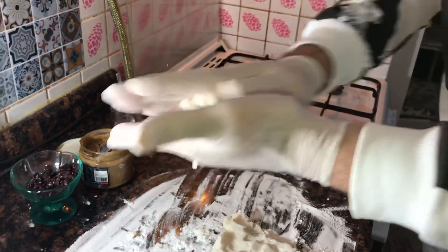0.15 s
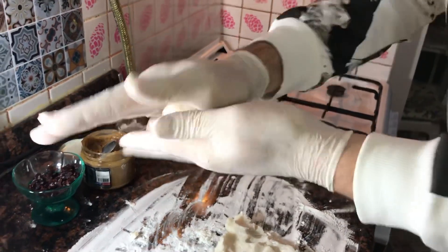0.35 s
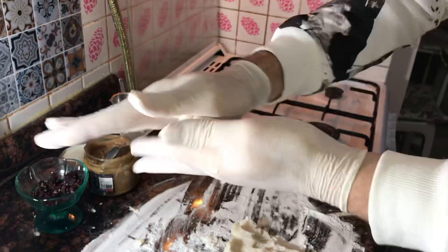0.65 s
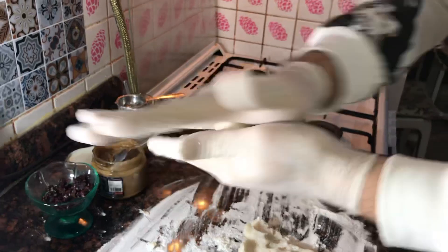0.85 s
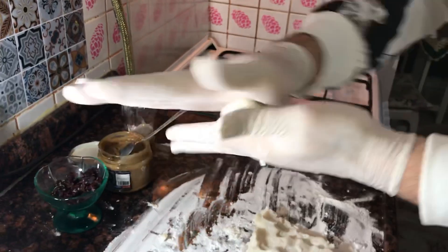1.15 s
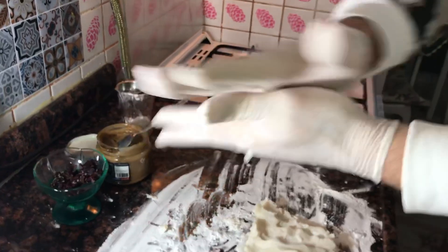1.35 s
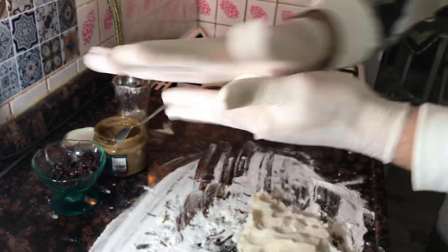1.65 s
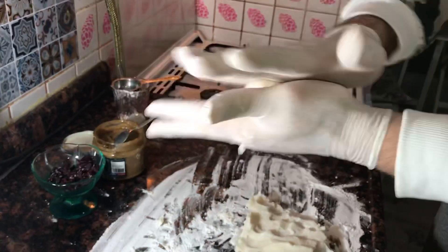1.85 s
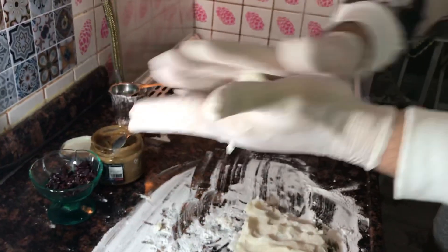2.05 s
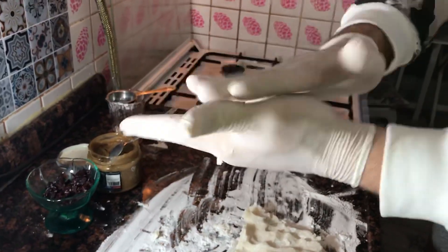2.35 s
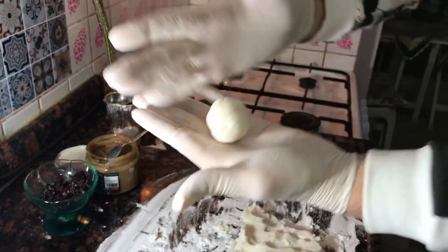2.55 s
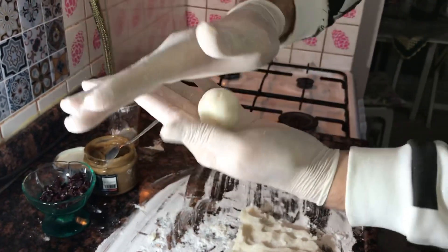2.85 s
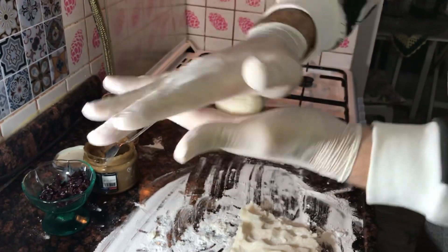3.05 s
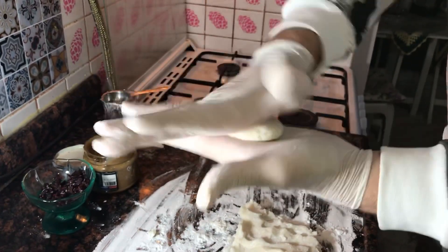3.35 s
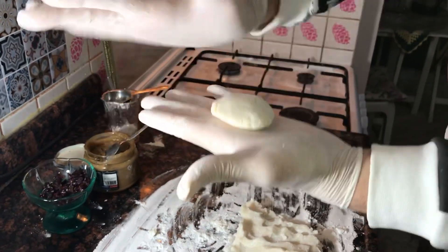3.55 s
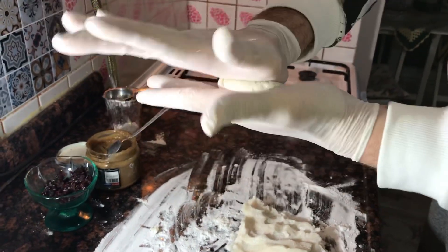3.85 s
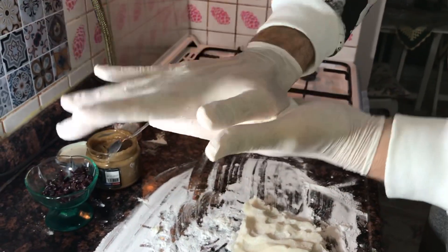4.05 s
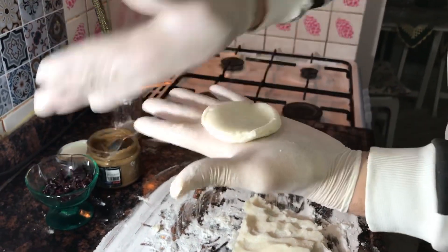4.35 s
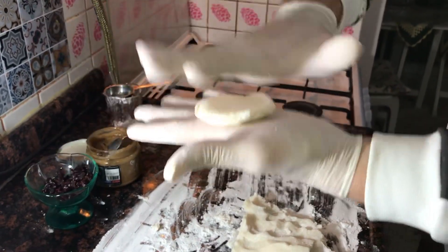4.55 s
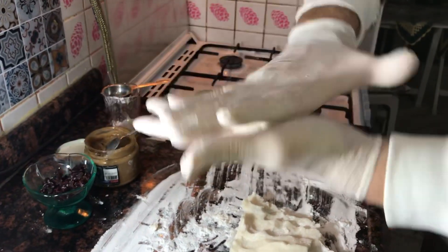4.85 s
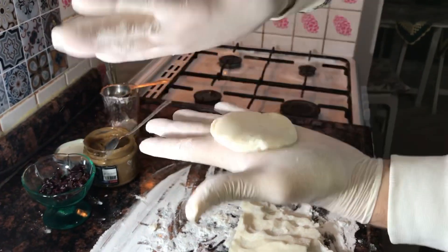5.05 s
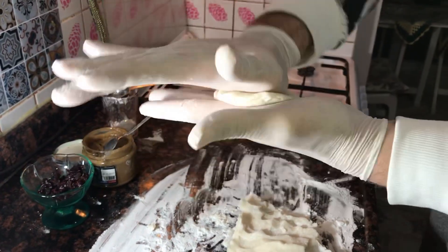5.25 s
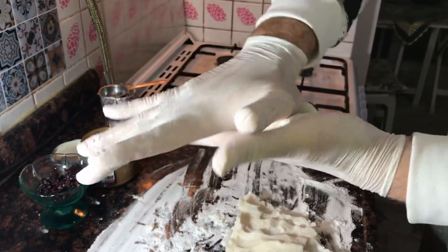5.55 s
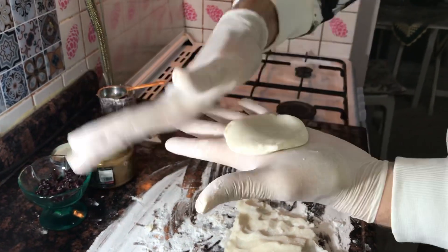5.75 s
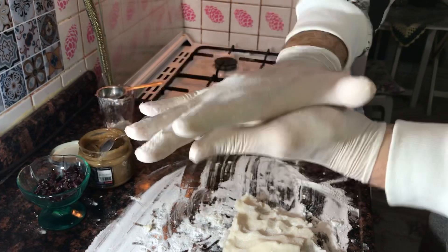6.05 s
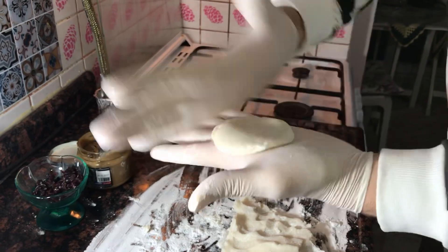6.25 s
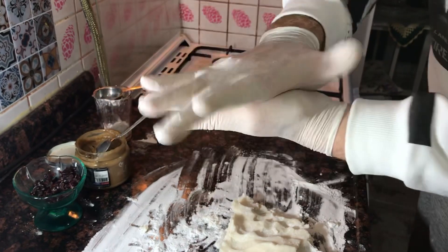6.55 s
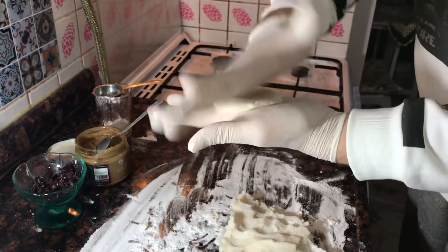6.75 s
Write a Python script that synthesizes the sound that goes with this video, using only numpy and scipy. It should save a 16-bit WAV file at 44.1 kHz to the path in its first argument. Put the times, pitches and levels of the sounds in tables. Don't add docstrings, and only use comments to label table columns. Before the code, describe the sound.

Thin gloves rub in grainy strokes over soft dough, then sticky snaps, pops and soft pats over a quiet low kitchen hum.

```python
import sys
import numpy as np
from scipy import signal
from scipy.fft import rfft, irfft, next_fast_len
from scipy.io import wavfile
from scipy.ndimage import uniform_filter1d, map_coordinates

SR = 44100
rng = np.random.default_rng(int(sys.argv[2]) if len(sys.argv) > 2 else 0)


def generate_wav(sig):
    pcm = np.round(np.clip(np.atleast_2d(sig).T, -1, 1) * 32767).astype(np.int16)
    wavfile.write(sys.argv[1], SR, pcm)


def linear_from_db(decibels):
    return 10 ** (np.asarray(decibels, float) / 20)


N = 304718


def unit(x):
    return x / np.sqrt(np.mean(x ** 2) + 1e-20)


def along(points, hz):
    f, v = np.transpose(points)
    return np.interp(np.log(hz + 1), np.log(f + 1), v)


def curves(rows):
    s, *columns = np.transpose(rows)
    return [np.interp(np.arange(N) / SR, s, column) for column in columns]


def wobble(rate):
    return map_coordinates(rng.standard_normal(int(N * rate / SR) + 4), [np.arange(N) * rate / SR])


def filtered(x, response):
    m = next_fast_len(len(x) + 2048)
    return irfft(rfft(x, m) * response(np.fft.rfftfreq(m, 1 / SR)), m)[:len(x)]


def band(hz, low_hz, high_hz):
    return 1 / np.sqrt((1 + (low_hz / (hz + 1)) ** 6) * (1 + (hz / high_hz) ** 6))


def patchy(patchy_db):
    z = signal.stft(rng.standard_normal(N), nperseg=256)[2]
    field = uniform_filter1d(rng.standard_normal(z.shape), size=7, axis=0)
    field = uniform_filter1d(field, size=9, axis=1)
    return signal.istft(z * linear_from_db(patchy_db * unit(field)), nperseg=256)[1][:N]


def region_levels(db, bright_db, body_db):
    return db - bright_db, db + body_db, db + bright_db


# (frequency [Hz], level [dB per Hz])
FILM_COLOUR = [(410, -15), (700, -13.5), (1120, -13), (1710, -10.5), (1920, -11), (2730, -8.5), (4260, -3),
               (4990, -1.5), (6070, -3), (10300, 0), (12500, 0), (15200, 0), (16000, -5.5)]
# (low edge [Hz], high edge [Hz])
HAND_REGIONS = [
    (700, 2500),
    (2500, 7000),
    (7000, 17000),
]
# (time [s], length [s], level [dB], brightness [dB])
ROLLS = [(.005, 0.011, -54, 2), (0.052, 0.0081, -46, 0), (.195, 0.017, -55.5, 11.5),
         (0.26, 0.051, -52, 6.5), (0.321, 0.039, -54.5, 0), (0.408, .014, -59.5, -2),
         (0.425, 0.033, -54, 6.5), (0.478, 0.015, -53.5, 9), (0.517, 0.022, -55, 6),
         (0.559, 0.033, -56.5, 11.5), (0.675, 0.057, -60.5, 4), (0.744, 0.036, -57.5, 8),
         (0.781, 0.035, -53.5, 0.5), (0.83, 0.032, -60.5, 7.5), (0.956, 0.014, -64.5, 12),
         (1.045, 0.032, -58.5, 2.5), (1.226, 0.022, -59.5, 4.5), (1.313, 0.034, -62, 3.5),
         (1.346, 0.025, -60, 4), (1.156, 0.013, -65, 3), (1.505, 0.011, -56.5, 9), (1.661, 0.021, -62, 2),
         (1.758, 0.023, -65.5, 10), (1.813, 0.043, -62.5, 4), (1.865, 0.019, -59, 5),
         (1.909, 0.01, -58, -1), (2.035, 0.019, -60.5, 1.5), (2.131, 0.057, -59.5, 3.5),
         (2.235, 0.018, -53.5, 6), (2.258, 0.015, -50, 9.5), (2.345, 0.042, -62.5, 5.5),
         (2.406, 0.038, -68, 6.5)]
# (time [s], length [s], level [dB], brightness [dB])
BRUSHES = [(1.107, 0.072, -62.5, 3.5), (1.573, 0.18, -65.5, 2), (1.428, 0.013, -61.5, 2),
           (2.479, 0.039, -75, 7), (2.932, 0.053, -72.5, 3.5), (3.001, 0.09, -68, 3.5),
           (3.251, 0.049, -65, 0), (4.262, 0.052, -66, 5.5), (4.712, 0.032, -67, 5.5),
           (5.402, 0.05, -70.5, 6.5), (5.57, 0.062, -62, 5), (6.125, 0.037, -66, 4.5),
           (6.72, 0.074, -70.5, 4)]
# (time [s], length [s], level [dB], brightness [dB], air gap [Hz])
PEELS = [(3.167, 0.083, -65, -1, 3300), (3.329, 0.029, -54.5, 3, 4150), (3.353, 0.029, -56, 5.5, 4180),
         (3.371, 0.0078, -46, 0, 2980), (3.397, 0.043, -65.5, -1, 3450), (4.107, 0.014, -56.5, 0.5, 3550),
         (4.129, 0.038, -53, 2.5, 3280), (4.145, 0.012, -48, -1, 5560), (4.168, 0.011, -42.5, 0, 5370),
         (4.194, 0.038, -48, -1.5, 4740), (4.813, 0.055, -62.5, 4, 5980), (4.855, 0.0046, -46, 0, 3300),
         (4.858, 0.0074, -31.5, 0, 4200), (4.863, 0.024, -42, -4, 5800), (4.903, 0.03, -69, -11, 3700),
         (5.512, 0.026, -59, 2, 5000), (5.636, 0.045, -48, 3, 4300), (5.656, 0.017, -43.5, -1, 4830),
         (5.681, 0.014, -61, 5, 4570), (6.219, 0.01, -50.5, 5, 3600), (6.701, 0.043, -60, 1.5, 4500)]
# (time [s], length [s], level [dB], brightness [dB], air gap [Hz])
LANDINGS = [
    (4.563, 0.009, -47, -7, 4160),
    (4.625, 0.078, -66, 2, 3480),
    (5.169, 0.014, -60.5, -6, 3600),
    (5.931, 0.013, -50, -8, 2280),
    (5.947, 0.038, -66.5, -7, 1210),
    (5.989, 0.089, -72, 4, 1400),
    (6.503, 0.0087, -39.5, -4.5, 5800),
    (6.508, 0.015, -43.5, -0.5, 2120),
    (6.532, 0.013, -56.5, -5, 4000),
    (6.564, 0.038, -72, 0, 3280),
]
# (time [s], length [s], level [dB], brightness [dB], air gap [Hz])
TOUCHES = [(0.236, .012, -55, -4, 1710), (0.762, 0.015, -51.5, 6, 6800), (4.838, .016, -54, -2, 6000),
           (5.601, .01, -52.5, -3, 2100), (0.18, 0.011, -57, 2, 5500), (0.648, 0.007, -58, 1, 9000),
           (2.879, .016, -62, 3, 5440), (3.639, 0.017, -63, -1.5, 1900), (4.1497, .011, -40, -1, 5600),
           (4.5547, 0.0062, -50.5, -4, 2700), (5.481, 0.0053, -66.5, -5, 5000),
           (5.491, 0.011, -66.5, 12, 9000), (5.583, 0.022, -48.5, 5.5, 5800),
           (5.9216, 0.0096, -50, -10, 1900), (6.146, 0.0045, -62, 3, 6000), (6.15, 0.0058, -52, 8, 3220),
           (6.154, 0.0095, -54.5, 8, 6500), (6.175, 0.015, -59, 7.5, 6500), (6.205, 0.0067, -59, 8, 6500),
           (6.494, 0.0063, -46, -5, 2400), (6.734, 0.0044, -61.5, 6, 9000), (6.745, .004, -66, 3, 5500)]


def slips():
    slip_body_db, body_db_per_oct = -4.5, 14
    cupped_hz = 2500
    grit_db = 3.1
    out, t = np.zeros(N + SR), np.arange(-SR // 16, SR // 16) / SR
    flat = [(*row, 4000 + 192 * row[3]) for row in ROLLS + BRUSHES]
    events = [(row, False) for row in flat + PEELS + LANDINGS] + [(row, True) for row in TOUCHES]
    for (s, length, level_db, bright_db, gap_hz), sudden in events:
        steps = rng.standard_normal(len(t) // 24 + 1).clip(-2, 1.7)
        grains = linear_from_db(grit_db * np.repeat(steps, 24)[:len(t)])
        white = grains * rng.standard_normal(len(t))
        if sudden:
            swell = (t >= 0) * np.exp(-(t / (0.66 * length)) ** 2)
        else:
            shape = np.clip(length / 0.03, 0.75, 1.5) * np.where(t < 0, 2.8, 1.4)
            swell = np.exp(-(np.abs(t) / (0.53 * length)) ** shape)

        def cavity(f):
            return linear_from_db(along(FILM_COLOUR, f)) * (1 + 1.36 / (1 + ((f - gap_hz) / (0.1 * gap_hz)) ** 2))

        body_db = slip_body_db + body_db_per_oct * min(0, np.log2(gap_hz / cupped_hz))
        levels = region_levels(level_db, bright_db, body_db)
        parts = [linear_from_db(db) * unit(filtered(white, lambda f: cavity(f) * band(f, *edges)))
                 for db, edges in zip(levels, HAND_REGIONS)]
        out[round(s * SR):][:len(t)] += swell * sum(parts)
    return out[SR // 16:][:N]


# (time [s], effort [dB], brightness [dB])
RUB = [(0.0, -50.5, 3), (0.4, -55, 1), (0.52, -50.5, 5.5), (0.66, -57, 1.5), (2.2, -59.5, 3.5),
       (2.31, -58.5, 4), (2.5, -70, -6.5), (3.3, -65.5, 4), (3.7, -71.5, 7), (4.04, -70, 2), (4.18, -52, 1),
       (4.39, -75.5, 1), (4.73, -63, 3.5), (5.0, -72.5, 1), (5.5, -61, -6.5), (5.75, -73.5, 2),
       (6.15, -67, -8.5), (6.91, -82, 12)]


def rubbing():
    jerk = 2 * wobble(30) + 0.69 * wobble(110)
    ticks = rng.random(N) < 600 / SR
    ticks = ticks * linear_from_db(np.minimum(4 * rng.exponential(size=N), 9)) * rng.choice([-1, 1], N)
    out = np.zeros(N)
    for level_db, (low, high) in zip(region_levels(*curves(RUB), body_db=3), HAND_REGIONS):
        slip = linear_from_db(jerk + 3.9 * wobble(30)) * (patchy(patchy_db=1.5) + 0.13 * unit(ticks))
        coloured = filtered(slip, lambda f: linear_from_db(along(FILM_COLOUR, f)) * band(f, low, high))
        out += linear_from_db(level_db - 9.0) * unit(coloured)
    return out


# (time [s], ring [dB], ring pitch [Hz], crack [dB])
SNAPS = [(0.051, -39, 4030, -21), (0.108, -32, 5300, -48), (0.3248, -27.5, 4040, -48),
         (0.3965, -28, 3600, -52), (0.4724, -38, 3080, -36), (0.9506, -55, 6600, -36),
         (1.2235, -45, 2410, -39), (1.5006, -35, 4230, -36), (1.858, -31, 5700, -48),
         (2.255, -67, 6030, -20), (3.329, -24, 4040, -50), (3.37, -27, 3160, -28), (3.6383, -47, 2330, -51),
         (3.805, -42, 8000, -57), (4.167, -27, 4500, -31.5), (4.1814, -24, 4450, -33.5),
         (4.1956, -24.5, 3770, -38), (4.5622, -25.5, 6900, -41), (4.8588, -12, 3400, -16),
         (5.177, -44, 2280, -60), (3.349, -32, 5000, -40), (3.361, -50, 9000, -36), (5.584, -38, 6220, -36),
         (5.655, -19, 6160, -42), (6.1506, -31, 3240, -34), (6.217, -31, 3596, -16),
         (6.5035, -22, 5850, -19),
         (.129, -29, 7000, -56), (.155, -32, 8200, -56), (.28, -33, 6500, -46), (.65, -46, 7500, -52),
         (3.707, -62, 9000, -58), (3.825, -46, 8800, -66), (4.8582, -7.5, 5840, -16),
         (5.639, -41, 2610, -38.5), (6.177, -45, 6500, -42), (5.566, -42, 6000, -44),
         (5.62, -38, 5000, -42), (6.2135, -38, 6970, -32), (6.677, -34, 3300, -66), (6.712, -39, 6540, -37)]


def snaps():
    out, t = np.zeros(N + SR), np.arange(-64, SR // 40) / SR
    attack_t60_s, ring_t60_s, crack_t60_s = 0.0018, 0.0067, 0.032
    for s, ring_db, hz, crack_db in SNAPS:
        white = rng.standard_normal((2, len(t)))
        breath = unit(filtered(white[0], lambda f: band(f, hz / 1.42, hz * 1.2)))
        ring = 0.49 * np.cos(2 * np.pi * hz * t) + 0.32 * breath
        hiss = unit(filtered(white[1], lambda f: band(f, 8500, 14500)))
        crack = 0.25 * np.cos(2 * np.pi * 11800 * t) + 0.75 * hiss
        crack = linear_from_db(-60 * np.abs(t) / crack_t60_s) * crack
        fade = linear_from_db(-60 * np.where(t < 0, -t / attack_t60_s, t / ring_t60_s))
        for db, part in ((ring_db - 6.5, fade * ring), (crack_db - 0.8, fade * crack)):
            out[round(s * SR):][:len(t)] += linear_from_db(db) * part / np.abs(part).max()
    return out[64:][:N]


# (time [s], peak [dB], low edge [Hz], high edge [Hz], t60
# [s])
PATS = [
    (0.473, -43.5, 300, 990, 0.048),
    (3.367, -51, 500, 1500, 0.094),
    (4.148, -45.5, 550, 1200, 0.075),
    (4.198, -44, 198.5, 800, 0.079),
    (4.563, -39, 69.6, 700, 0.065),
    (4.857, -33, 193, 915, 0.11),
    (5.653, -45, 198, 700, 0.1),
    (5.9253, -30.5, 99, 570, 0.07),
    (6.499, -36, 80.4, 590, 0.13),
    (6.8325, -40.5, 600, 5200, 0.0047),
]


def pats():
    out, t = np.zeros(N + SR), np.arange(-SR // 50, SR // 7) / SR
    for s, db, low_hz, high_hz, t60 in PATS:
        puff = rng.standard_normal(len(t)) * linear_from_db(-60 * np.abs(t) / t60) * (t > 0)
        u = np.maximum(t, 0) * high_hz * 3.0
        push = -u * np.exp(-u)
        for gain, stroke in ((0.9, push), (0.6, puff)):
            part = filtered(stroke, lambda f: band(f, low_hz, high_hz))
            out[round(s * SR):][:len(t)] += linear_from_db(db) * gain * part / np.abs(part).max()
    return out[SR // 50:][:N]


# (time [s], peak [dB], ring pitch [Hz])
POPS = [
    (.0512, -29, 4000),
    (0.765, -31, 2400),
    (.9505, -40, 7000),
    (3.368, -28, 3270),
    (4.1512, -26, 5600),
    (4.8907, -30, 4170),
    (5.1718, -29, 2470),
    (5.9255, -43, 1610),
    (6.499, -20, 2500),
    (6.5034, -22, 3000),
]


def pops():
    out, t = np.zeros(N + SR), np.arange(SR // 50) / SR
    for s, db, hz in POPS:
        spike = np.exp(-t / 0.00007) * np.cos(2 * np.pi * 6000 * t)
        ring = 0.64 * linear_from_db(-60 * t / 0.0074) * np.sin(2 * np.pi * hz * t)
        out[round(s * SR):][:len(t)] += linear_from_db(db) * (spike - ring)
    return out[:N]


# (start [s], length [s], level [dB], first [Hz], last
# [Hz])
POCKETS = [(0.239, 0.017, -52, 1760, 1670), (0.244, .028, -49, 4500, 9500), (.41, 0.02, -51, 5000, 9000),
           (0.474, 0.021, -52, 2700, 3300), (.505, 0.035, -54, 3200, 5500), (0.544, 0.03, -44, 13500, 9500),
           (0.547, 0.026, -54, 3180, 6560), (.765, 0.011, -46.5, 2286, 2005),
           (.768, 0.028, -47.5, 4400, 4000), (0.77, 0.02, -46, 6700, 7150), (1.044, 0.015, -58, 4480, 4500),
           (1.105, 0.027, -57, 5400, 5240), (1.22, 0.027, -62, 4380, 4230),
           (1.65, 0.042, -60.5, 4000, 3700), (1.79, 0.031, -62, 4200, 3820), (1.906, .02, -62, 4210, 3900),
           (2.881, .015, -57, 3120, 3330), (3.377, .015, -58, 3400, 3600), (3.658, .018, -65, 4580, 4220),
           (3.775, .012, -59.5, 9150, 9000),
           (4.14, 0.038, -43, 6000, 5400), (4.166, .01, -39, 12400, 12300), (4.185, .02, -49, 4260, 4800),
            (4.561, .006, -38.5, 3290, 3570), (4.853, 0.013, -30, 4210, 4100),
            (4.857, 0.01, -33, 5900, 5780), (4.87, .025, -47, 5900, 6120), (4.872, 0.01, -38, 3200, 3500),
            (4.873, .01, -39, 4270, 4080), (4.894, 0.0057, -44, 4080, 3800),
            (4.915, 0.022, -58, 4000, 3470), (4.94, .05, -57, 3700, 3900), (5.172, .006, -60, 2480, 2170),
            (5.507, .045, -58, 8500, 8700), (5.583, .015, -52, 2190, 2100),
            (5.585, 0.015, -49, 12300, 12300), (5.617, 0.048, -51.5, 1980, 2150),
            (5.927, 0.0047, -38, 1850, 1480), (5.923, 0.014, -46, 910, 800),
            (4.556, 0.012, -52.5, 1100, 1000), (5.939, 0.052, -56, 2010, 1394),
            (6.498, 0.0096, -33, 2490, 3210), (6.5, 0.016, -43, 4260, 4000),
            (6.503, .014, -46.5, 1490, 1380), (6.522, .03, -58, 2510, 2310),
            (6.681, 0.022, -55, 2790, 2620), (6.684, 0.019, -58, 4500, 4370)]


def pockets():
    out = np.zeros(N + SR)
    for s, length, db, first_hz, last_hz in POCKETS:
        u = np.arange(SR // 12) / SR / length
        progress = np.minimum(u, 1)
        white = rng.standard_normal((2, len(u)))
        a, b = (filtered(v, lambda f: band(f, 0, 0.17 * first_hz)) for v in white)
        turn = 2 * np.pi * np.cumsum(first_hz * (last_hz / first_hz) ** progress) / SR
        whistle = unit(a * np.cos(turn) + b * np.sin(turn))
        out[round(s * SR):][:len(u)] += linear_from_db(db) * np.sin(np.pi * progress ** 0.67) * whistle
    return out[:N]


def crinkles():
    centre_hz, log_spread, cycles, over_effort_db = 4800, 0.5, 10, -4.5
    draw, t = rng.random((2000, 2)), np.arange(260) / SR
    at = (draw[:, 0] * N).astype(int)
    hz = centre_hz * np.exp(log_spread * rng.standard_normal((len(at), 1)))
    hz = np.clip(hz, 900, 14000)
    luck_db = -np.maximum(4 * np.log(draw[:, 1]), -10)
    size = linear_from_db(curves(RUB)[0][at] + over_effort_db + luck_db)[:, None]
    rings = size * np.sin(2 * np.pi * hz * t) * linear_from_db(-60 * t * hz / (3 * cycles))
    return np.bincount((at[:, None] + np.arange(len(t))).ravel(), rings.ravel(), N + SR)[:N]


# (frequency [Hz], t60 [s])
TILES = [(200, 0.44), (1500, 0.34), (4000, 0.26), (12000, 0.16)]


def kitchen(x):
    turn_s = 0.3
    out, step = np.zeros(N + 2 * SR), int(turn_s * SR)
    for k in range(0, N, step):
        hz, t, z = signal.stft(rng.standard_normal(SR // 2), SR, nperseg=256)
        tail = signal.istft(z * linear_from_db(-60 * t / along(TILES, hz)[:, None]), SR, nperseg=256)[1]
        wet = signal.fftconvolve(x[k:k + step], tail / np.linalg.norm(tail))
        out[k + 250:][:len(wet)] += wet
    return out[:N]


# (time [s], level [dB])
DRONE = [(0, -63), (.15, -65.5), (1.25, -52), (1.41, -67), (1.52, -59), (2.0, -52.5), (2.68, -58),
         (2.8, -70), (2.98, -59), (3.37, -64.5), (3.5, -70.5), (3.7, -62), (4.31, -66), (5.2, -73),
         (5.36, -63.5), (6.0, -71.5), (6.91, -70)]


def drone():
    level_db, = curves(DRONE)
    hz = 143.2 - 2.05 * np.arange(N) / SR
    level = np.sqrt(2) * linear_from_db(level_db + 0.6 * wobble(9))
    return level * np.sin(2 * np.pi * np.cumsum(hz + 0.8 * wobble(12)) / SR)


# (frequency [Hz], level [dB])
HUM = [(40.5, -74), (48.6, -70), (93, -76.5), (99, -79.5)]


def hum():
    out = np.zeros(N)
    for hz, db in HUM:
        level = np.sqrt(2) * linear_from_db(db + 2.5 * wobble(2))
        out += level * np.sin(2 * np.pi * np.cumsum(hz + 0.4 * wobble(3)) / SR)
    return out


# (time [s], half length [s], level [dB])
GUSTS = [
    (0.0, 0.2, 11),
    (1.068, 0.35, 9.5),
    (3.245, 0.34, 8.5),
    (5.417, 0.36, 11.5),
    (6.625, 0.54, 6),
]
# (frequency [Hz], level [dB per Hz])
RUMBLE = [(25, -40), (36, -14), (43, -6), (51, -8), (60, -9.5), (97, -7), (120, -6.5), (200, -19.5),
          (260, -14), (440, -120)]
# (frequency [Hz], width [Hz], level [dB])
DUCT = [(340, 31, 10), (570, 42, 3), (800, 18, -4.5), (1290, 36, -5)]
# (frequency [Hz], level [dB per Hz])
AIR = [(94, -27), (160, -3.5), (173, -7.5), (353, -11.5), (508, -15), (1020, -19.5), (1080, -19.5),
       (1330, -23), (1680, -23.5), (2470, -24), (3630, -30.5), (5990, -26), (7400, -32), (12500, -31),
       (16000, -48.5)]


def background():
    rumble_db, duct_db, murmur_db = -68, -76, -67.5
    murmur_share = 0.23
    swell_db = sum(db * np.exp(-((np.arange(N) / SR - s) / half) ** 4) for s, half, db in GUSTS)

    def pipe(f):
        return sum(linear_from_db(db) / (1 + ((f - hz) / width) ** 2) for hz, width, db in DUCT)

    rumble = unit(filtered(rng.standard_normal(N), lambda f: linear_from_db(along(RUMBLE, f))))
    duct = unit(filtered(rng.standard_normal(N), pipe))
    murmur = unit(filtered(patchy(patchy_db=0.7), lambda f: linear_from_db(along(AIR, f))))
    air = linear_from_db(duct_db + swell_db) * duct + linear_from_db(murmur_db + murmur_share * swell_db) * murmur
    return linear_from_db(rumble_db) * rumble + air


def scene():
    hands = slips() + rubbing() + snaps() + pats() + crinkles() + pockets() + pops()
    echo = linear_from_db(-12.0) * kitchen(hands)
    return (hands + echo + drone() + hum() + background())[None]


def band_limit(x):
    return signal.sosfilt(signal.butter(12, 16570, fs=SR, output="sos"), x)


# (frequency [Hz], width [Hz], depth [dB])
PORT = [(5000, 600, -4.5), (7600, 750, -3), (10350, 1100, -5.5)]


def record(dry):
    top_hz = 15950

    def port(f):
        dips_db = sum(db / (1 + ((f - hz) / width * 2) ** 2) for hz, width, db in PORT)
        return (f < top_hz) * linear_from_db(dips_db)

    mix = filtered(dry[0], port)[None]
    return band_limit(mix)


dry = scene()
out = record(dry)
generate_wav(out)
```